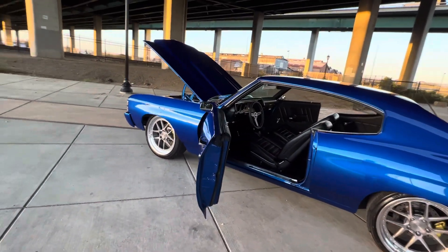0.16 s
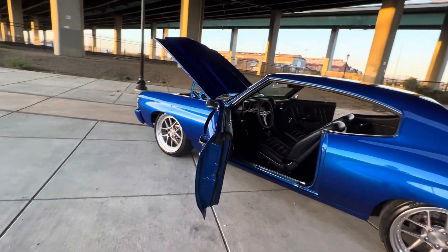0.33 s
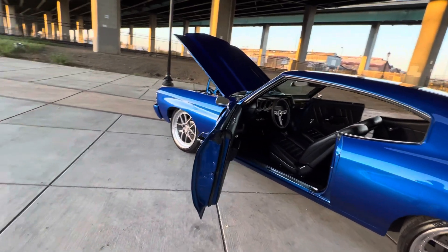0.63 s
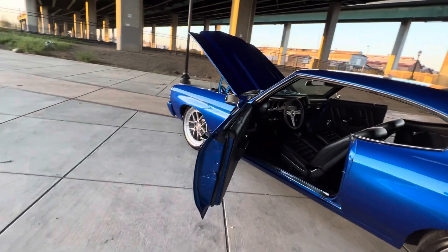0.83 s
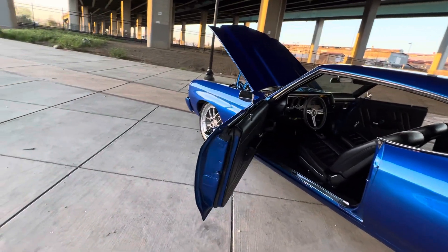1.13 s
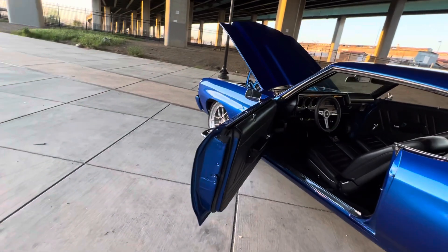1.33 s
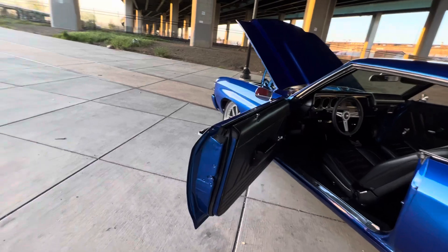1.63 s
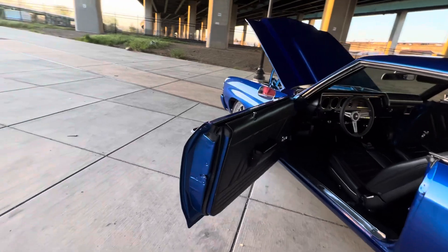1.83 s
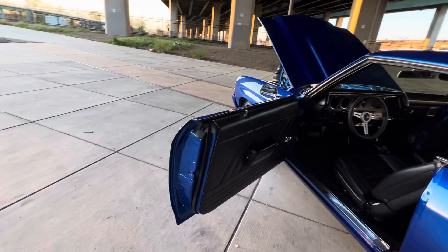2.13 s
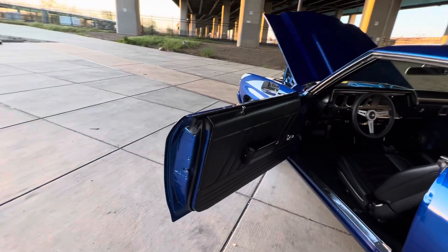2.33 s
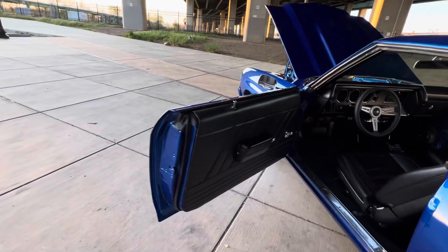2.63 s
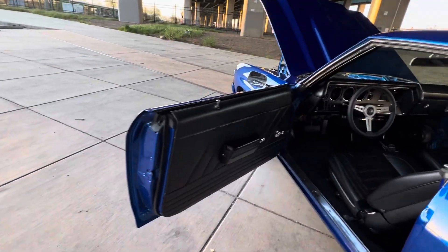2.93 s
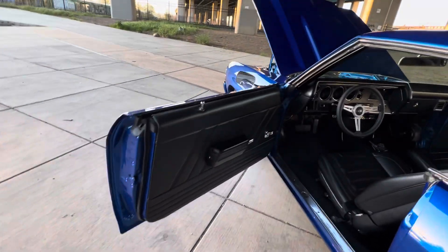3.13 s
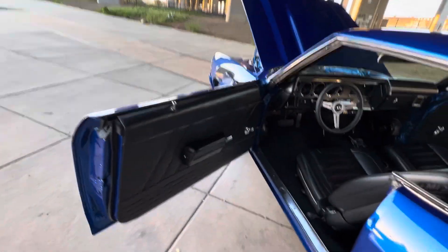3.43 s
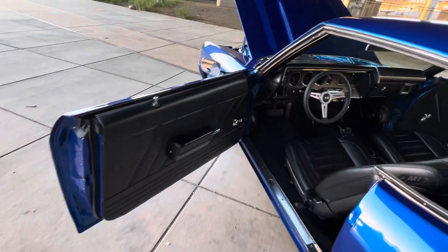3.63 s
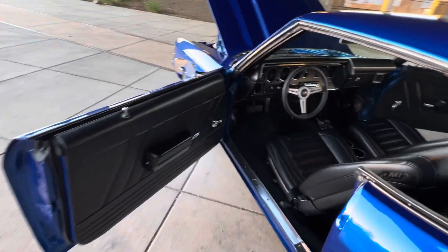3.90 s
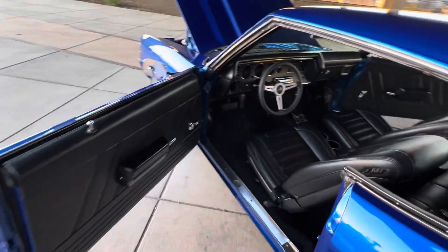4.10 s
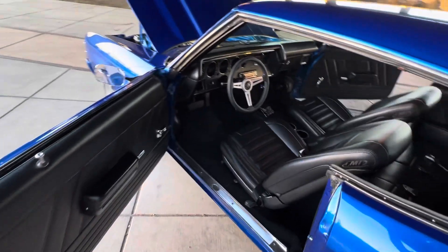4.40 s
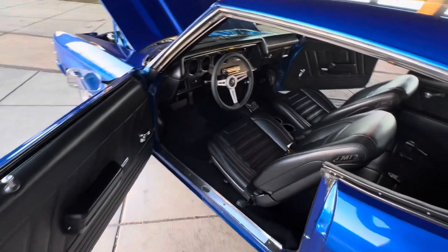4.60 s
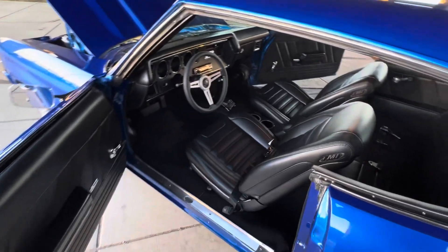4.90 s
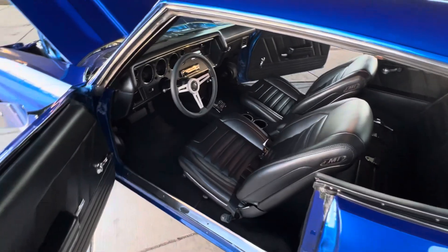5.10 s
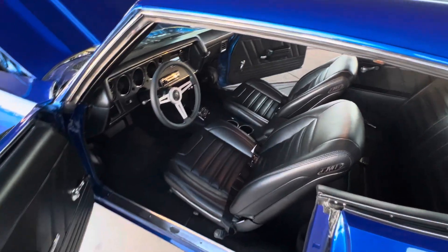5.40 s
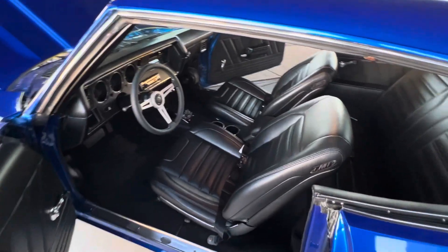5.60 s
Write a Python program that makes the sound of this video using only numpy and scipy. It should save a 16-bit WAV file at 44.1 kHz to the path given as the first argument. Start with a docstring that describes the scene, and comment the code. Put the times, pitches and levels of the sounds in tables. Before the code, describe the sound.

Heavy freeway traffic rumbles and roars overhead, a double metallic clack at a joint echoing early, then a truck drones past.

```python
"""A deep rumble and a grainy tyre roar: freeway traffic on a concrete viaduct, heard from underneath.
Shaped noise makes the rumble, roar, thumps and hiss; phase-integrated partials make the engines. A truck's drone
climbs, throbs against a second engine and sinks at the end. Two axles strike a steel joint: clatter, plate
modes and a long echo of decaying noise. Close by are faint scuffs of noise and dry ticks of filtered impulses.
"""
import sys
import numpy as np
from scipy import signal
from scipy.fft import rfft, irfft
from scipy.io import wavfile
from scipy.ndimage import uniform_filter1d

SR = 44100
rng = np.random.default_rng(int(sys.argv[2]) if len(sys.argv) > 2 else 0)


def file_out(sig):
    """Save sig as 16-bit WAV at sys.argv[1]."""
    # one column per channel
    cols = np.atleast_2d(sig).T
    # limit, then scale
    lim = np.clip(cols, -1, 1)
    pcm = np.round(lim * 32767).astype(np.int16)
    wavfile.write(sys.argv[1], SR, pcm)


N = 253707
TIME = np.arange(N) / SR
FREQ = np.maximum(np.arange(N // 2 + 1) * SR / N, 1)  # bin frequencies in Hz, kept above 0 for the logarithm


def undb(db):
    """Decibel law: 20 dB is a tenfold amplitude."""
    return 10 ** (np.asarray(db) / 20)


def unit(x):
    """Power normalisation: scale to rms 1."""
    return x / np.sqrt(np.mean(x ** 2))


def curves(table):
    """Linear interpolation: each column after the time becomes one value a sample."""
    seconds, *columns = np.transpose(table)
    return [np.interp(TIME, seconds, column) for column in columns]


def over_freq(points, outside=None):
    """Interpolation in log frequency: a (Hz, value) table on every frequency bin."""
    hz, value = np.transpose(points)
    return np.interp(np.log(FREQ), np.log(hz), value, outside, outside)


def colour(x, points, tilt_db=0):
    """Linear filtering: shape by a spectrum tilted about 1 kHz, with nothing passed beyond its ends."""
    octaves = np.log2(FREQ / 1000)
    gain = undb(over_freq(points, -np.inf) + tilt_db * octaves)
    return irfft(rfft(x) * gain, N)


def walk(rate):
    """Low-passed random process: values held 1 / rate s, slewed twice and scaled to rms 1."""
    hold = int(SR / rate)
    steps = np.repeat(rng.standard_normal(N // hold + 1), hold)
    slewed = uniform_filter1d(uniform_filter1d(steps, hold), hold)
    return unit(slewed[:N])


def fading(rate):
    """Multipath fading: many echoes add up to a randomly turning amplitude and phase, mean power 1."""
    return (walk(rate) + 1j * walk(rate)) / np.sqrt(2)


# Likeness of the two microphone ports. Each row: frequency in Hz, likeness from 0 to 1.
PORT_LIKENESS = [(50, .99), (100, .98), (180, .93), (300, .75), (420, .8), (540, .05), (700, .23),
                 (1500, .1), (3000, .05)]
# Lateness of the traffic at the left port. Each row: frequency in Hz, lag in seconds.
LEFT_LAG = [(200, 0.00024), (500, 0.00037), (900, 0.00014), (1700, 0.00014), (2600, 0.0002)]


def diffuse(points, tilt_db=0):
    """Diffuse-field coherence: noise from all sides is alike at two ports in the bass, unrelated in the treble."""
    mid, side = rfft(rng.standard_normal((2, N)))
    alike = np.clip(over_freq(PORT_LIKENESS), 0, 1)
    mid = mid * np.sqrt(1 + alike)
    side = side * np.sqrt(1 - alike)
    left = (mid + side) * np.exp(-2j * np.pi * FREQ * over_freq(LEFT_LAG))
    ports = irfft(np.array([left, mid - side]), N)
    return unit(colour(ports, points, tilt_db))


def burst(at, rise_s, t60):
    """Exponential growth and decay: swell up to a moment, then fall 60 dB in t60 seconds."""
    age = TIME - at
    return np.exp(np.minimum(age, 0) / rise_s - np.log(1000) * np.maximum(age, 0) / t60)


def drone(hz, scatter, flutter_hz, apart):
    """Multipath interference: a partial beats with its echoes, a little differently at each port if apart > 0."""
    lag_s = np.interp(hz, *np.transpose(LEFT_LAG))
    phase = 2 * np.pi * (np.cumsum(hz) / SR - hz * lag_s * np.array([[1], [0]]))
    common = fading(flutter_hz)
    opposed = apart * fading(flutter_hz) * np.array([[1], [-1]])
    paths = 1 + scatter * (common + opposed)
    return unit(np.real(paths * np.exp(1j * phase)))


# Traffic flow on the deck, which also drives the tyres. Each row: time in seconds, level in dB.
TRAFFIC_FLOW = [(0, -2.5), (.35, -5), (.75, 0), (1.5, -1.5), (2.0, -1.5), (2.55, 2.5), (3.0, 0.9),
                (3.55, 0.8), (4.15, 1.5), (4.75, 1.1), (5.05, -0.5), (5.4, 0.3), (5.75, -1.5)]
# Spectrum of the deck's deep rumble. Each row: frequency in Hz, density in dB per Hz.
RUMBLE_SPECTRUM = [(12, -40), (25, -17.5), (32, -14.5), (40, 2), (50, 4), (62, 5), (80, 1.5), (95, 3),
                   (130, -45.5)]
# Spectrum of the deck's boom. Each row: frequency in Hz, density in dB per Hz.
BOOM_SPECTRUM = [(60, -7), (90, -4), (130, -2.5), (180, -3), (225, -5), (290, -8), (340, -16.5),
                 (500, -29.5)]
RUMBLE_DB, BOOM_DB = -26, -23.5  # at a flow of 0 dB


def deck_rumble():
    """Forced vibration: the concrete spans rumble and boom in step with the traffic flow."""
    flow_db, = curves(TRAFFIC_FLOW)
    rumble = diffuse(RUMBLE_SPECTRUM) * undb(RUMBLE_DB + flow_db)
    boom = diffuse(BOOM_SPECTRUM) * undb(BOOM_DB + flow_db)
    return rumble + boom


# Wheels thumping the deck. Each row: time in seconds, level in dB, 60 dB decay time in seconds, pitch in Hz.
WHEEL_THUMPS = [(0.501, -19, 0.27, 116), (.75, -21, 0.6, 90), (2.171, -16, .3, 156), (2.231, -17, .25, 115),
                (2.305, -14.5, 0.19, 99), (2.369, -22, .2, 140), (2.42, -15.5, 0.17, 52),
                (2.69, -18.5, 0.25, 114)]
# Spectrum of a thump. Each row: multiple of its pitch, density in dB per Hz.
THUMP_SPECTRUM = [(.35, -35), (.65, -9), (.85, 0), (1.15, 0), (1.6, -9), (3.5, -42)]


def wheel_thumps():
    """Impact excitation: heavy wheels strike the deck, each thump a decaying noise band at its own pitch."""
    out = 0
    for at, db, t60, pitch_hz in WHEEL_THUMPS:
        spectrum = [(ratio * pitch_hz, gain_db) for ratio, gain_db in THUMP_SPECTRUM]
        out = out + diffuse(spectrum) * undb(db) * burst(at, 0.013, t60)
    return out


# Spectrum of the tyre roar. Each row: frequency in Hz, density in dB per Hz.
ROAR_SPECTRUM = [(120, -17), (220, 1), (300, 3.5), (400, 2.5), (490, -0.7), (580, -2.5), (740, 1),
                 (900, -2.5), (1250, -6.5), (1600, -10.5), (2000, -16), (2800, -24.5), (3400, -29.5),
                 (6000, -58)]
TYRE_DB, TYRE_FADE_DB_PER_S = -29, 0.0069
TYRE_FLOW_SHARE = 0.05  # dB of roar per dB of flow


def tyre_roar():
    """Incoherent summation: many tyres merge into one unsteady, grainy noise."""
    flow_db, = curves(TRAFFIC_FLOW)
    roar_db = TYRE_DB + TYRE_FLOW_SHARE * flow_db - TYRE_FADE_DB_PER_S * TIME
    unsteady_db = 0.4 * walk(13)
    grain_db = 0.82 * walk(60)
    return diffuse(ROAR_SPECTRUM) * undb(roar_db + unsteady_db + grain_db)


# Truck engine note. Each row: time in seconds, pitch in Hz.
TRUCK_NOTE = [(0, 232), (1.05, 238), (1.35, 243.5), (1.8, 247.5), (2.5, 249), (2.9, 253.5), (3.4, 258),
              (4.0, 259), (4.4, 254), (4.7, 257), (5.75, 225)]
# Swell and fade of the truck's drone under the deck. Each row: time in seconds, level in dB.
TRUCK_SWELL = [(0, -44), (.95, -40), (1.22, -25.5), (1.4, -27), (1.58, -33), (2.15, -32), (2.33, -40),
               (2.46, -25), (2.68, -30), (2.84, -18.5), (2.95, -16.5), (3.0, -25), (3.08, -34),
               (3.14, -19.5), (3.22, -26), (3.4, -29), (3.85, -40), (4.2, -34), (4.52, -26), (4.9, -39),
               (5.75, -38)]
# Spectrum of the truck's roar under load. Each row: frequency in Hz, density in dB per Hz.
TRUCK_ROAR_SPECTRUM = [(250, -19), (320, -7.5), (420, 0), (510, 1), (600, -16.5), (720, -13)]
# the load builds until the driver eases off, then drops to coasting, the floor at both ends
EASE_OFF_S, BUILD_DB_PER_S, EASE_DB_PER_S, COAST_DB = 3.11, 7, 40, -18.5
OCTAVE_DB, TRUCK_ROAR_DB = -34.5, -33  # at full load
TRUCK_SCATTER, TRUCK_FLUTTER_HZ = 0.33, 25.92  # share of echoes in the drone, and how fast they beat


def truck():
    """Harmonic radiation: the engine note climbs, while its octave and roar follow the load."""
    truck_hz, = curves(TRUCK_NOTE)
    level_db, = curves(TRUCK_SWELL)
    since = TIME - EASE_OFF_S
    load_db = np.maximum(np.minimum(BUILD_DB_PER_S * since, -EASE_DB_PER_S * since), COAST_DB)
    note = drone(truck_hz, scatter=TRUCK_SCATTER, flutter_hz=TRUCK_FLUTTER_HZ, apart=0.99) * undb(level_db)
    octave = drone(2 * truck_hz, scatter=1.3, flutter_hz=34.94, apart=0.84) * undb(OCTAVE_DB + load_db)
    roar = diffuse(TRUCK_ROAR_SPECTRUM) * undb(TRUCK_ROAR_DB + load_db)
    return note + octave + roar


# The second engine's note. Each row: time in seconds, pitch in Hz.
SECOND_NOTE = [(0, 228), (.7, 229), (1.3, 230), (2.2, 235)]
# Its strength. Each row: time in seconds, level in dB.
SECOND_SWELL = [(0, -41), (.35, -35), (.52, -26), (.65, -29), (.78, -25), (.95, -42), (1.22, -24),
                (1.55, -33), (2.15, -33), (2.6, -60)]


def second_engine():
    """Beating: a hum just below the truck's note throbs against it at the difference frequency."""
    hum_hz, = curves(SECOND_NOTE)
    hum_db, = curves(SECOND_SWELL)
    return drone(hum_hz, scatter=.2, flutter_hz=16, apart=.9) * undb(hum_db)


# Strength of the low exhaust note. Each row: time in seconds, level in dB.
EXHAUST_SWELL = [(0, -35.5), (2.2, -42.5), (2.62, -26.5), (3.1, -47), (3.75, -44), (4.02, -32.5),
                 (4.75, -25.5), (5.1, -31.5), (5.42, -19.5), (5.75, -29)]
EXHAUST_HZ, EXHAUST_WANDER = 58.16, 0.031  # mean pitch, and rms wander as a fraction of it


def exhaust():
    """Frequency modulation: a deep exhaust note wanders in pitch as it comes and goes."""
    exhaust_hz = EXHAUST_HZ * (1 + EXHAUST_WANDER * walk(3))
    level_db, = curves(EXHAUST_SWELL)
    return drone(exhaust_hz, scatter=0.6, flutter_hz=18, apart=0) * undb(level_db)


# Axles on the steel joint. Each row: time in seconds, swell in seconds, clatter level in dB, ring level in dB,
# frequency in Hz where the ring is favoured, echo level in dB, tilt in dB per octave.
JOINT_AXLES = [(0.472, 0.019, -25, -34.5, 1760, -28, -1), (0.647, 0.031, -27, -28, 1210, -24, -0.27)]
# Modes of the steel plate. Each row: frequency in Hz, level in dB, 60 dB decay time in seconds.
PLATE_MODES = [(668, -5, 1.2), (1130, -9, 1.1), (1206, 0, .3), (1234, -5, .9), (1255, -3, .25),
               (1568, -8, .6), (1635, -6, .6), (1740, -7, .3), (2003, -11, .6), (2420, -12, .8),
               (2603, -15, .7), (2970, -17, .7), (3236, -22, .5)]
# Spectrum of the clatter. Each row: frequency in Hz, density in dB per Hz.
CLATTER_SPECTRUM = [(200, -12), (500, -12), (1000, -1.5), (1350, 5.5), (1750, 12.5), (2400, 7.5),
                    (3000, -1), (3600, -11), (4700, -11.5), (7500, -17), (9000, -23.5), (11000, -57)]
# Spectrum of the joint's echo under the deck. Each row: frequency in Hz, density in dB per Hz.
ECHO_SPECTRUM = [(100, -15), (230, -2.5), (380, 8), (580, 0), (900, 2), (1300, 2), (1900, -6.5),
                 (2450, -7.5), (3100, -16), (3800, -26), (5000, -29), (7500, -37.5), (10000, -49.5)]
RING_REACH_DB_PER_OCTAVE = 3.5  # loss of a mode away from the axle's favoured frequency
LESSER_MODE_SPACING_HZ, LESSER_MODE_DB = 28, 3.2  # grid of the lesser modes, and their random spread
ECHO_FLICKER_DB, ECHO_SURGE_DB = 1.5, 1.2


def lesser_modes():
    """Modal density: the steel's many lesser modes comb the spectrum with random peaks and dips."""
    lesser_hz = np.arange(0, SR / 2, LESSER_MODE_SPACING_HZ)
    heights = np.interp(FREQ, lesser_hz, rng.standard_normal(len(lesser_hz)))
    return unit(undb(LESSER_MODE_DB * heights))


def joint():
    """Modal excitation and reverberation: each axle makes a clatter, ringing plate modes and a long echo."""
    out = 0
    comb = lesser_modes()
    # each mode reaches the two ports by many paths, so its ring is blurred
    modes = [drone(np.full(N, hz), scatter=2, flutter_hz=55, apart=1) for hz, _, _ in PLATE_MODES]
    for at, swell_s, clatter_db, ring_db, ring_hz, echo_db, tilt_db in JOINT_AXLES:
        # the tyre rolls on with a dull scrape, then slaps the plate
        scrape = diffuse(CLATTER_SPECTRUM, tilt_db - 5) * burst(at - .004, swell_s, .2) * undb(-2.5)
        slap = diffuse(CLATTER_SPECTRUM, tilt_db + 1.2) * burst(at - .001, .005, .11) * undb(.5)
        clatter = (scrape + slap) * undb(clatter_db + 2 * walk(300))
        # each axle favours the modes near its own pitch
        ring = 0
        for mode, (hz, db, t60) in zip(modes, PLATE_MODES):
            mode_db = db - RING_REACH_DB_PER_OCTAVE * abs(np.log2(hz / ring_hz))
            ring = ring + mode * undb(mode_db) * burst(at + 0.014, 0.027, t60)
        unsteady_db = ECHO_FLICKER_DB * walk(150) + ECHO_SURGE_DB * walk(25)
        echo = diffuse(ECHO_SPECTRUM, tilt_db) * burst(at + 0.028, 0.05, 2.3) * undb(echo_db + unsteady_db)
        out = out + irfft(rfft(clatter + echo) * comb, N) + ring * undb(ring_db)
    return out


# Ticks close by. Each row: time in seconds, peak level in dB before panning, left minus right in dB,
# low-pass cutoff in Hz, ping level in dB before panning.
CLOSE_TICKS = [(3.2213, -20, -15, 4300, -70), (3.4250, -22, -7, 8800, -27.5), (5.316, -28.5, -2, 6200, -70),
               (5.4166, -30, -11, 9500, -56), (5.5974, -35, -2, 11000, -62)]
# Spectrum of a tick. Each row: frequency in Hz, gain in dB.
TICK_SPECTRUM = [(200, -9.5), (900, 7.5), (2000, -7.5), (4000, -14), (6500, -16.5), (9000, -20.5),
                 (11000, -36)]
PING_HZ, PING_T60_S = 8750, .0035
TICK_RATTLE = 0.09  # size of the rattle against the first contact


def ticks():
    """Impulse response: a sharp contact with a short rattle is filtered, and a brief ping is added."""
    out = 0
    for at, db, pan_db, high_hz, ping_db in CLOSE_TICKS:
        contact = TICK_RATTLE * rng.standard_normal((2, N)) * burst(at, .0001, 0.013)
        contact[:, int(at * SR)] += 1
        low_pass = signal.butter(4, min(high_hz, .45 * SR), fs=SR, output="sos")
        tick = signal.sosfilt(low_pass, colour(contact, TICK_SPECTRUM))
        tick = tick / np.abs(tick).max() * undb(db)
        ping_envelope = burst(at - .0008, 0.00014, PING_T60_S)
        ping = np.sin(2 * np.pi * PING_HZ * (TIME - at)) * ping_envelope * undb(ping_db)
        pan = undb(np.array([[pan_db], [-pan_db]]) / 2)
        out = out + (tick + ping) * pan
    return out


# Scuffs close by. Each row: centre in seconds, time from centre to 1/e in seconds, level in dB,
# tilt in dB per octave.
CLOSE_SCUFFS = [(3.845, 0.035, -57.5, 10), (3.92, .07, -61, 6), (4.34, .035, -56, -2),
                (4.8, 0.16, -59, -3.5), (5.17, .04, -63, 5), (5.353, 0.054, -56, -8),
                (5.64, 0.067, -49, -7.5)]
# Spectrum of a scuff. Each row: frequency in Hz, density in dB per Hz.
SCUFF_SPECTRUM = [(1000, -3), (2500, 6), (5000, 0), (8300, 0), (9500, -20), (10500, -23)]


def scuffs():
    """Friction noise: soft, rough bursts of noise under bell-shaped envelopes."""
    out = 0
    for at, length, db, tilt_db in CLOSE_SCUFFS:
        bell = np.exp(-((TIME - at) / length) ** 2)
        out = out + diffuse(SCUFF_SPECTRUM, tilt_db) * undb(db) * bell
    return out * undb(2 * walk(150))


# Spectrum of the smooth hiss. Each row: frequency in Hz, density in dB per Hz.
HISS_SPECTRUM = [(1500, -14.5), (3200, -1.5), (4200, 1.5), (5000, 0.5), (6000, -2.5), (7000, -5.5),
                 (8500, -9), (9500, -16), (10200, -26.5), (11300, -35.5)]
# Spectrum of the bright sizzle. Each row: frequency in Hz, density in dB per Hz.
SIZZLE_SPECTRUM = [(4500, -17.5), (6500, 2.5), (8000, 0.5), (9000, -2.5), (10000, -13), (11000, -23)]
# Swell and fade of the sizzle. Each row: time in seconds, level in dB.
SIZZLE_SWELL = [(0, -86), (1.65, -74), (1.95, -65.5), (2.3, -62), (2.5, -64), (2.85, -61), (3.2, -63),
                (3.7, -65), (4.3, -68.5), (5.0, -81), (5.75, -72)]
HISS_DB = -58.5


def tyre_hiss():
    """Broadband noise: a smooth hiss above the roar, with a bright sizzle that swells and fades."""
    hiss = diffuse(HISS_SPECTRUM) * undb(HISS_DB + .4 * walk(6.5))
    sizzle_db, = curves(SIZZLE_SWELL)
    sizzle = diffuse(SIZZLE_SPECTRUM) * undb(sizzle_db + .8 * walk(9))
    return hiss + sizzle


# A faint, thin band of hiss that drifts down. Each row: time in seconds, centre in Hz, level in dB.
HISS_BAND_GLIDE = [(0, 11120, -94), (1.7, 11030, -82), (2.8, 10770, -73), (3.3, 10680, -76),
                   (3.75, 10500, -73), (4.25, 10270, -73), (4.8, 10160, -77), (5.75, 10050, -81)]
BAND_FADING_HZ, BAND_WAVER_DB = 400, 2  # rate of the random fading that widens it, and rms level waver


def hiss_band():
    """Narrow-band noise: fast random fading of a carrier gives a thin band of hiss, which drifts down."""
    centre_hz, level_db = curves(HISS_BAND_GLIDE)
    band = drone(centre_hz, scatter=10, flutter_hz=BAND_FADING_HZ, apart=1.0)
    return band * undb(level_db + BAND_WAVER_DB * walk(9))


def scene():
    """Superposition: everything that reaches the two ports adds up."""
    traffic = deck_rumble() + wheel_thumps() + tyre_roar()
    engines = truck() + second_engine() + exhaust()
    nearby = ticks() + scuffs()
    return traffic + engines + joint() + nearby + tyre_hiss() + hiss_band()


# Colour of the two ports. Each row: frequency in Hz, left minus right in dB.
PORT_BALANCE = [(100, 0), (500, 0.5), (800, 0.9), (1200, 3), (1600, 2.5), (2300, -1), (2800, 3), (3400, 5),
                (4200, 7.5), (5200, 8), (6800, 8.5), (8000, 2), (8700, -1), (10000, -0.2)]
TOP_HZ = 11200


def record(dry):
    """Frequency response: the left port is mostly brighter, the ends are eased and the top is cut steeply."""
    ease = np.minimum(1, np.minimum(TIME, TIME[-1] - TIME) / .004)
    balance_db = over_freq(PORT_BALANCE) * np.array([[.5], [-.5]])
    ports = irfft(rfft(dry * ease) * undb(balance_db), N)
    top_cut = signal.ellip(8, .2, 70, TOP_HZ, fs=SR, output="sos")
    return signal.sosfilt(top_cut, ports)


dry = scene()
out = record(dry)
file_out(out)
```